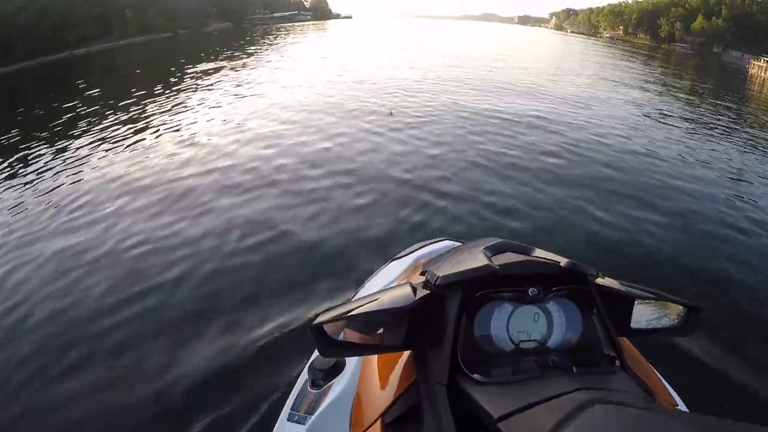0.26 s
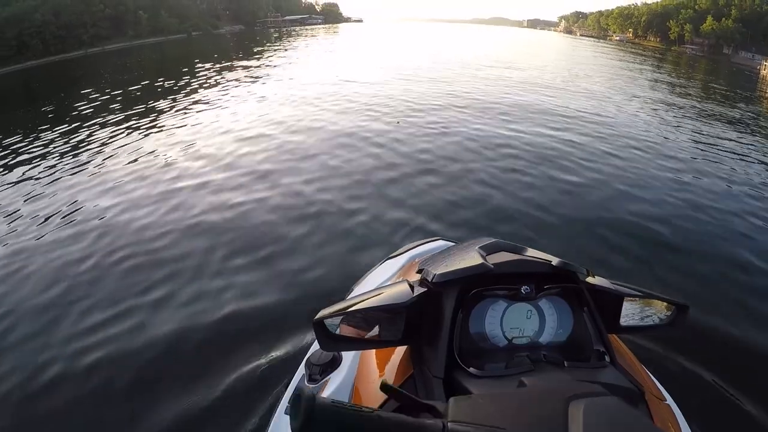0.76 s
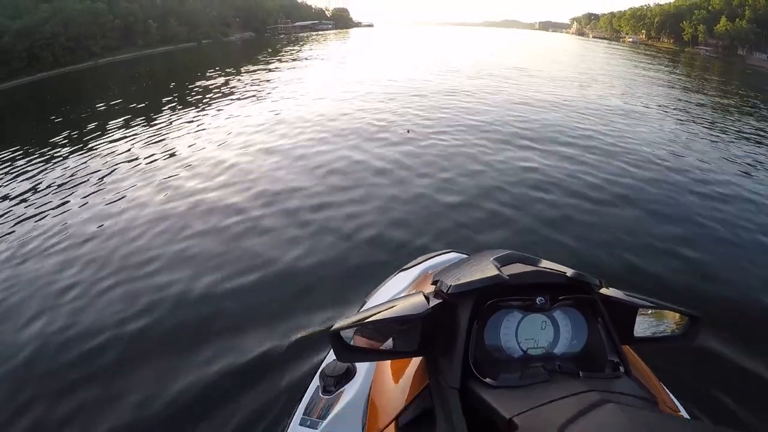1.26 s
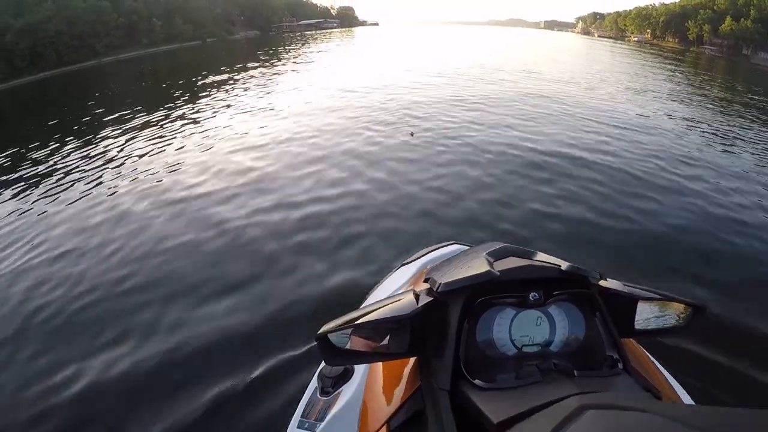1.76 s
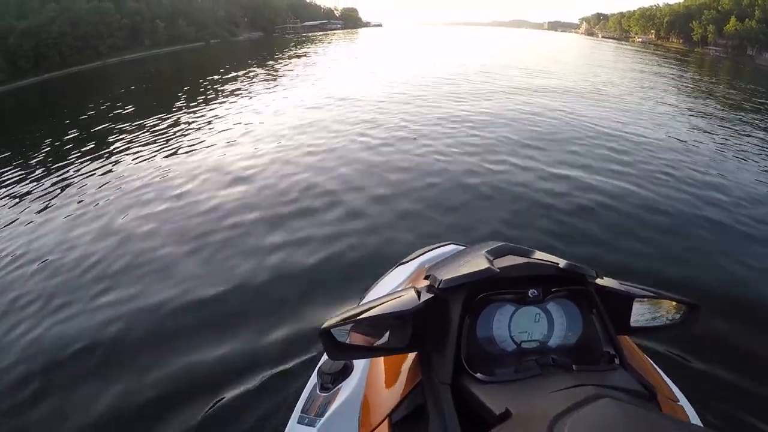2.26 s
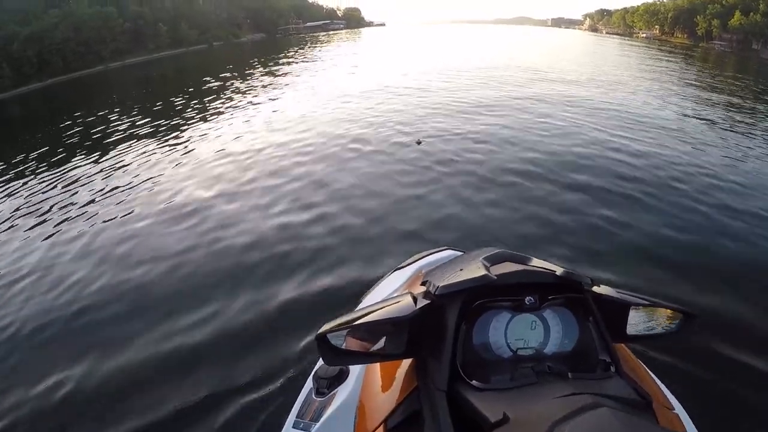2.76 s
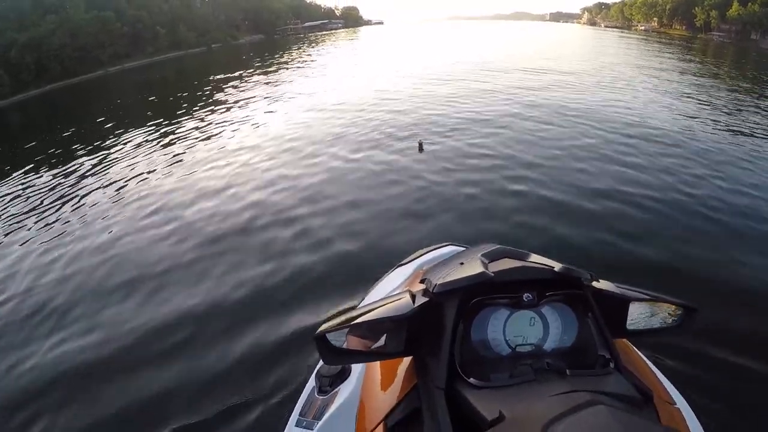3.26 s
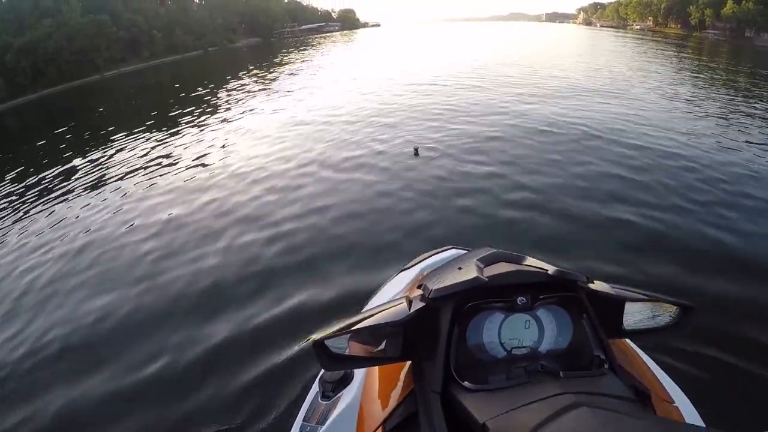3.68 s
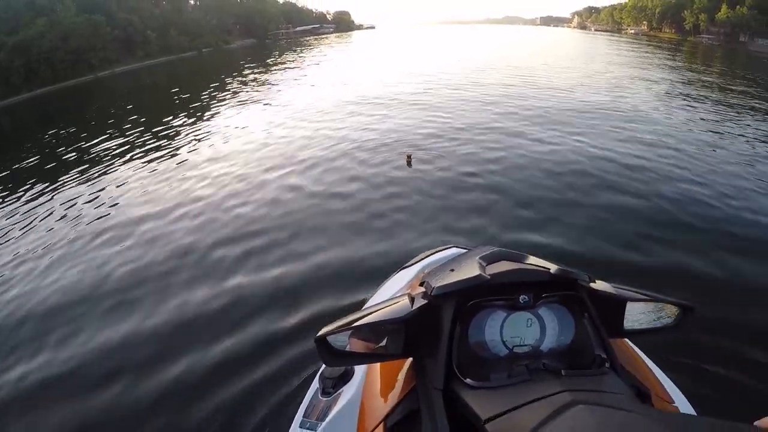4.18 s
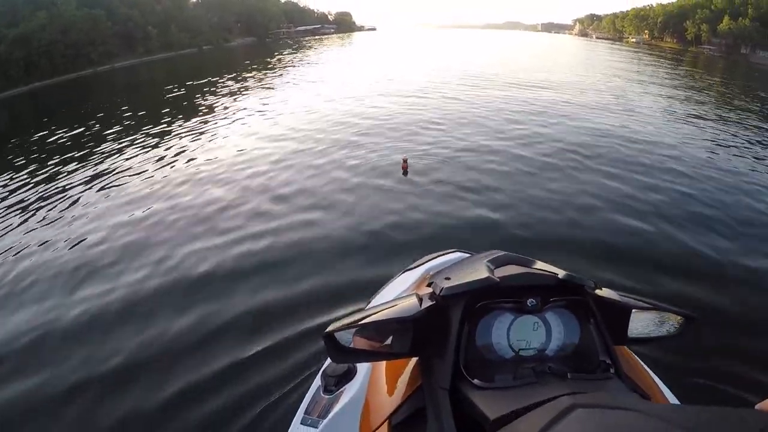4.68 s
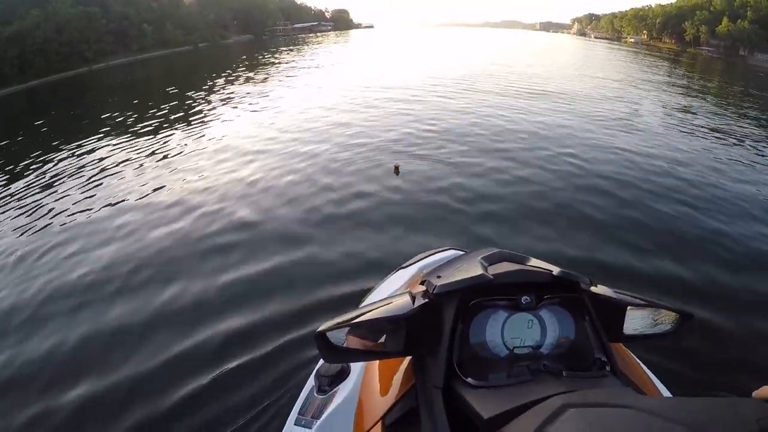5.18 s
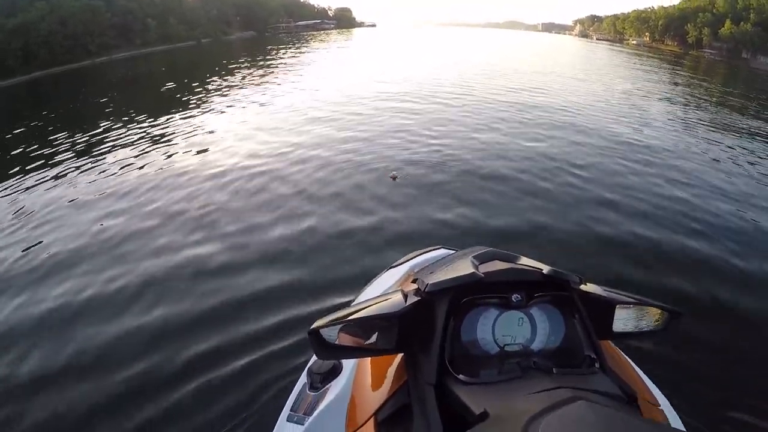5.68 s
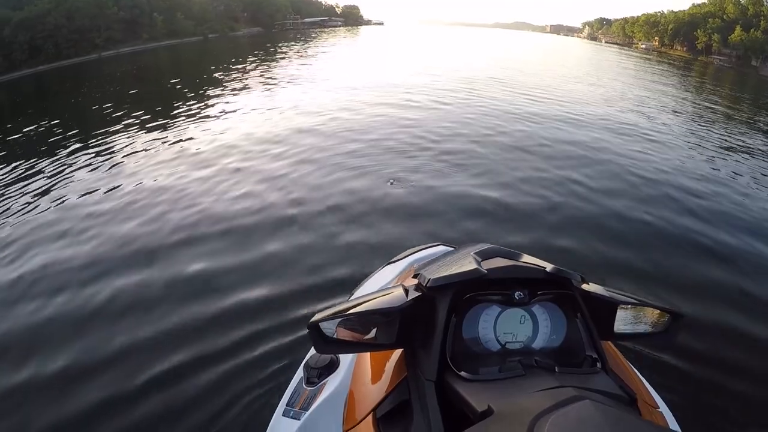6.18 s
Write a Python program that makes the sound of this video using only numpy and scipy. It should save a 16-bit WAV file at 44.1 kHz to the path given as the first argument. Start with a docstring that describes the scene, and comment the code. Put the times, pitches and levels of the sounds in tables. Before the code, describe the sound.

A small three-cylinder engine idles unevenly with a throbbing low hum, light metallic ticking, soft water wash and bubbles, and one brief squeak.

```python
"""A three-cylinder four-stroke water scooter idles unevenly on a calm lake, heard at the rider's helmet.
Engine lines rock the mounts; firings and exhaust gas ring the hull; the jet pump hums as modulated tones.
Valve ticks and rattle ring the metal cover; shaped noise makes wash, rumble and foot-well slop.
Gliding sines make bubbles, splashes and gurgles; a thin stack of overtones squeaks once, in two pulls."""
import sys
import numpy as np
from scipy import signal
from scipy.fft import rfft, irfft, next_fast_len
from scipy.io import wavfile
from scipy.ndimage import uniform_filter1d, map_coordinates

SR = 44100
rng = np.random.default_rng(int(sys.argv[2]) if len(sys.argv) > 2 else 0)


def unload_audio(sound):
    """Save the sound as a 16-bit wav file, at the path given as the first command line argument."""
    columns = np.transpose(np.atleast_2d(sound))
    # keep every value between -1 and 1, then stretch to whole-number steps
    steps = np.round(np.clip(columns, -1, 1) * 32767)
    wavfile.write(sys.argv[1], SR, steps.astype(np.int16))


def rack_gain(trim_db):
    """Turn a fader trim in dB into the linear factor to multiply a signal by."""
    fader = np.asarray(trim_db, float)
    return 10 ** (fader / 20)


N = 284356
T = np.arange(N) / SR
FULL = next_fast_len(N + SR)
HZ = np.fft.rfftfreq(FULL, 1 / SR)
SIDES = np.array([[.5], [-.5]])  # left, right


def level(x, rms_db):
    """Scale to an rms level."""
    return x * rack_gain(rms_db) / np.sqrt(np.mean(x ** 2))


def over_hz(table):
    """A (frequency [Hz], value) table read on a log-frequency axis."""
    hz, value = np.transpose(table)
    return np.interp(np.log(HZ + 1), np.log(hz + 1), value)


def ring(x, hz, width_hz):
    """Two-pole resonance, gain 1 at the centre."""
    return signal.lfilter(*signal.iirpeak(hz, hz / width_hz, SR), x)


def walk(rate_hz):
    """Random levels held 1 / rate_hz and smoothed twice; spread near 1."""
    hold = int(SR / rate_hz)
    steps = np.repeat(rng.standard_normal(N // hold + 1), hold)
    return 1.91 * uniform_filter1d(uniform_filter1d(steps, hold), hold)[:N]


def strikes(times_s, sizes):
    """Single-sample blows at the given moments."""
    return np.bincount(np.clip((times_s * SR).astype(int), 0, N - 1), sizes, N)


def moments(turn, places):
    """Times [s] at which each engine cycle passes the given places."""
    return np.interp(np.arange(int(turn[-1]))[:, None] + places, turn, T)


# left over right at the microphone ports: (frequency [Hz], level difference [dB])
PORT_DIFFERENCE = [(30, 2.5), (100, 3.5), (140, 1.6), (270, 0.5), (430, 1.5), (620, -1.3), (860, -8.5),
                   (1500, -7), (3000, -6.5), (4500, 0), (7000, 0), (8000, -6), (11000, -1)]
# phase by which left leads: (frequency [Hz], lead [rad])
PORT_PHASE = [(30, -.2), (340, -.3), (620, -.76), (860, -1.55), (1200, -1.1), (1500, .3), (2000, .74),
              (3200, .05), (4500, -.5), (6000, -1.4), (8000, -3.06), (11000, -3.6)]


def port_response():
    """Level and phase differences between the ports, half on each side."""
    return rack_gain(SIDES * over_hz(PORT_DIFFERENCE)) * np.exp(1j * SIDES * over_hz(PORT_PHASE))


def ports(x):
    """One source as the left and right ports hear it."""
    return irfft(rfft(x, FULL) * port_response(), FULL)[:, :N]


# hunting idle: (time [s], engine cycle rate [Hz], half the crank speed)
IDLE_SPEED = [(0.0, 15.51), (0.17, 14.97), (0.3, 15.89), (0.37, 15.03), (0.42, 15.81), (0.56, 15.58),
              (0.62, 15.01), (0.73, 15.47), (0.78, 15.13), (0.84, 15.76), (0.98, 14.95), (1.11, 14.75),
              (1.16, 15.32), (1.29, 15.66), (1.49, 15.06), (1.54, 15.48), (1.65, 14.75), (1.84, 15.5),
              (2.06, 14.9), (2.28, 15.66), (2.43, 15.78), (2.78, 15.27), (3.04, 15.33), (3.23, 16.07),
              (3.28, 15.18), (3.35, 15.96), (3.65, 14.95), (3.7, 15.23), (3.98, 15.03), (4.03, 15.68),
              (4.17, 15.34), (4.27, 15.62), (4.41, 15.02), (4.5, 15.59), (4.76, 14.85), (5.05, 15.63),
              (5.1, 15.23), (5.29, 15.58), (5.54, 15.02), (5.79, 15.66), (5.84, 15.11), (6.01, 15.72),
              (6.24, 15.39), (6.45, 15.77)]
START_CYCLES = .066


def idle():
    """Engine position in cycles, two crank turns each: the integral of the hunting speed."""
    return START_CYCLES + np.cumsum(np.interp(T, *np.transpose(IDLE_SPEED))) / SR


# engine lines: (multiple of cycle rate, rms level [dB], wobble [dB], thump place in cycle [0-1])
ROCKING_LINES = [(2, -59, 1.2, .63), (3, -54, 1.2, .63), (4, -47, .7, .63), (5, -67, 1.5, .73),
                 (6, -72, 2.5, .63), (9, -62, 2.5, .29), (11, -66, 2.5, .28), (13, -63, 2.5, .28)]


def rocking(turn):
    """Engine rocks on its mounts: cycle harmonics sharing a place add into one inward thump a cycle."""
    out = 0
    for multiple, rms_db, wobble_db, place in ROCKING_LINES:
        line = np.cos(2 * np.pi * multiple * (turn - place))
        out = out - np.sqrt(2) * rack_gain(rms_db + wobble_db * walk(6)) * line
    return out


# firings: (place in cycle [0-1], relative strength [dB])
FIRING_PLACES = [(0.201, -4), (0.528, -8.5), (0.87, -8)]
# exhaust and hull modes: (frequency [Hz], nominal width [Hz], firing gain [dB], gas gain [dB])
HULL_MODES = [(142.2, 23.7, -4, -5), (175.7, 56, -6, -2.5), (221, 36.5, -5, -5.5), (312.7, 27, -8.5, -13.5),
              (393.7, 28, -11, -15.5), (431.6, 35.3, -7.5, -5.5), (452.2, 17, -7, -12.5)]
# underwater burble, used about each column's mean: (time [s], lower-mode level [dB], upper-mode level [dB])
BURBLE_SWELL = [(0.05, -59, -61.5), (0.07, -52, -61), (0.28, -50.5, -58), (0.99, -51.5, -56),
                (1.11, -50, -62), (1.39, -53.5, -58), (1.69, -53.5, -60), (2.35, -51, -59),
                (2.42, -48, -53.5), (2.44, -48.5, -57.5), (2.93, -54.5, -56), (2.97, -47, -63),
                (3.05, -56, -60), (3.07, -49.5, -58), (3.29, -51, -57), (3.71, -54, -58.5),
                (4.63, -53, -58), (4.75, -50.5, -61), (4.9, -53.5, -57), (5.39, -51, -57), (5.44, -55, -59),
                (5.53, -49, -55), (5.57, -49, -66), (5.64, -52, -56), (5.69, -53, -60), (5.78, -51, -56),
                (5.96, -55, -59.5), (6.15, -47.5, -54.5), (6.19, -52.5, -60), (6.4, -49.5, -55.5)]
FIRING_RMS_DB, FIRING_SCATTER_DB, FIRING_JITTER_S = -53.5, 2, .0007
GAS_RMS_DB, UPPER_HZ = -54.5, 300


def exhaust(turn):
    """Uneven firings and turbulent gas ring the same modes; exhaust burbles under the waterline."""
    place, strength_db = np.transpose(FIRING_PLACES)
    times = moments(turn, place)
    times_s = times + FIRING_JITTER_S * rng.standard_normal(times.shape)
    strengths_db = strength_db + FIRING_SCATTER_DB * rng.standard_normal(times.shape)
    blows = strikes(times_s.ravel(), rack_gain(strengths_db).ravel())
    gas = rng.standard_normal(N) * rack_gain(1.4 * walk(12))
    s, *swells_db = np.transpose(BURBLE_SWELL)
    lower, upper = (rack_gain(np.interp(T, s, db - db.mean())) for db in swells_db)
    fired, swirl = 0, 0
    for k, (hz, width_hz, fired_db, gas_db) in enumerate(HULL_MODES):
        swell = upper if hz > UPPER_HZ else lower
        # ringing each mode twice keeps the valleys dark
        fired_mode = ring(ring(blows, hz, 1.6 * width_hz), hz, 1.6 * width_hz)
        gas_mode = ring(ring(gas, hz, 1.34 * width_hz), hz, 1.34 * width_hz)
        fired = fired + (-1) ** k * rack_gain(fired_db) * swell * fired_mode
        swirl = swirl + rack_gain(gas_db) * swell * gas_mode
    return level(fired, FIRING_RMS_DB) + level(swirl, GAS_RMS_DB)


# main pump line before wobble: (time [s], rms level [dB])
HUM_LEVEL = [(0.0, -40.5), (0.07, -53), (0.16, -44), (0.23, -54.5), (0.36, -46.5), (0.38, -51.5),
             (0.55, -52), (0.61, -43), (0.7, -52.5), (0.74, -47), (0.84, -55.5), (0.9, -47), (1.11, -45),
             (1.17, -63.5), (1.18, -53), (1.67, -43.5), (1.83, -51.5), (1.92, -42), (1.98, -48.5),
             (2.06, -42), (2.08, -47), (2.39, -57.5), (2.42, -50.5), (2.53, -56), (2.55, -49.5),
             (2.71, -49.5), (2.75, -45.5), (2.95, -49), (3.02, -44), (3.05, -54), (3.09, -50.5),
             (3.14, -59.5), (3.21, -50), (3.38, -54.5), (3.48, -49.5), (3.5, -52.5), (3.59, -42.5),
             (3.73, -48), (3.92, -45), (4.02, -52.5), (4.06, -46), (4.24, -51.5), (4.42, -42), (4.47, -54),
             (4.52, -46.5), (4.76, -44), (5.04, -54.5), (5.1, -46.5), (5.14, -54), (5.24, -48.5),
             (5.28, -58.5), (5.37, -48.5), (5.62, -45), (5.78, -55), (5.82, -43.5), (5.93, -53.5),
             (6.16, -53), (6.2, -43.5), (6.23, -52.5), (6.45, -48.5)]
HUM_MULTIPLE, HUM_LEAD_S, HUM_WOBBLE_DB = 18, .028, 1.08


def pump(turn, flutter_rad=.3, lower_db=-13, upper_db=-17):
    """Blades passing vanes hum; a neighbour line one cycle rate to each side makes the hum throb."""
    hz = HUM_MULTIPLE * np.interp(T + HUM_LEAD_S, *np.transpose(IDLE_SPEED))
    rms_db = np.interp(T, *np.transpose(HUM_LEVEL)) + HUM_WOBBLE_DB * walk(14)
    blade = 2 * np.pi * np.cumsum(hz) / SR + flutter_rad * walk(25)
    cycle = 2 * np.pi * turn + 1.27 * walk(5)
    lines = np.cos(blade) + rack_gain(lower_db) * np.cos(blade - cycle) + rack_gain(upper_db) * np.cos(blade + cycle)
    return np.sqrt(2) * rack_gain(rms_db) * lines


# loose cover modes: (frequency [Hz], width [Hz], rms level [dB])
RATTLE_MODES = [(2935, 160, -92.5), (3380, 130, -92), (3750, 200, -95.5)]


def rattle(turn):
    """Tiny random knocks, bunched by the firings, ring the cover's main modes."""
    bunch_db = 2.4 * np.cos(2 * np.pi * len(FIRING_PLACES) * (turn - .98))
    knock_db = 5 * rng.exponential(size=N) ** .7 + bunch_db + 2 * walk(20)
    knocks = rng.standard_normal(N) * rack_gain(knock_db)
    return sum(level(ring(knocks, hz, width_hz), rms_db) for hz, width_hz, rms_db in RATTLE_MODES)


# port-to-port likeness of water noise: (frequency [Hz], likeness [0-1])
LIKENESS = [(30, 0.95), (140, 1), (430, 0.5), (700, 0.98), (1100, 0.3), (2000, 0.3), (3400, 0.2),
            (6000, 0.1), (10000, 0.2)]


def rush(spectrum, flicker_db, treble_db=0, count=20):
    """Noise in half-octave bands, neighbours flickering partly together; partly alike at both ports."""
    alike = np.clip(over_hz(LIKENESS), 0, 1)
    white = rfft(rng.standard_normal((2, FULL)))
    pair = np.array([white[0], alike * white[0] + np.sqrt(1 - alike ** 2) * white[1]])
    pair = pair * rack_gain(over_hz(spectrum)) * port_response()
    scale = np.sqrt(np.mean(irfft(pair.mean(0), FULL) ** 2))
    step = 2 * np.log2(HZ / 16 + 1e-9)  # half octaves above 16 Hz
    out, shared = 0, walk(3.9)
    for k in range(count):
        shared = .58 * shared + .7 * walk(10)
        treble_share = np.clip((k - 13) / 3, 0, 1)  # 0 at 1.4 kHz, 1 from 4.1 kHz
        band = irfft(pair * np.clip(1 - abs(step - k), 0, 1), FULL)[:, :N]
        out = out + band * rack_gain(flicker_db * shared + treble_share * treble_db)
    return out / scale


# wash; spray less wash, about its mean, lifts the treble: (time [s], wash level [dB], spray level [dB])
WASH_LEVEL = [(0.05, -65.5, -84), (0.23, -66.5, -81.5), (0.24, -74, -81), (0.28, -63.5, -82.5),
              (0.37, -67.5, -83), (0.4, -62, -83), (0.44, -71, -83), (0.46, -65, -83), (0.85, -64, -82),
              (1.11, -67, -82), (1.14, -64.5, -83.5), (1.2, -67.5, -84), (1.94, -67, -82),
              (2.19, -68, -85.5), (2.33, -66, -83), (2.4, -68, -83.5), (2.54, -64, -84), (2.56, -67.5, -84),
              (2.74, -63, -82), (2.76, -66.5, -83), (3.14, -66, -84.5), (3.25, -67, -85.5),
              (3.36, -64.5, -82), (3.37, -60.5, -82), (3.41, -65, -82), (3.59, -66.5, -84.5),
              (3.85, -66.5, -83.5), (4.88, -67.5, -85), (4.91, -66.5, -84.5), (5.3, -65, -82),
              (5.78, -68, -86), (5.82, -64.5, -81.5), (5.83, -66.5, -84.5), (5.92, -64, -84),
              (5.96, -67.5, -85), (5.99, -64, -79.5), (6.13, -65, -82.5), (6.15, -67, -84),
              (6.38, -63, -82), (6.4, -63.5, -84.5)]
# wash spectrum: (frequency [Hz], relative density [dB per Hz])
WASH_SPECTRUM = [(300, -31), (510, -3), (582, -4.5), (729, -4), (854, -5.5), (937, -9.5), (1080, -8),
                 (2560, -22.5), (3420, -26.5), (4180, -31), (5150, -30), (5550, -25), (6130, -24),
                 (6990, -25.5), (7900, -32.5), (12000, -45), (15600, -81), (22000, -120)]


def wash(turn):
    """Water rushes along the hull, whose shaking pulses it once a crank turn."""
    s, wash_db, spray_db = np.transpose(WASH_LEVEL)
    lift_db = spray_db - wash_db
    treble_db = np.interp(T, s, lift_db - lift_db.mean())
    pulse_db = .75 * np.cos(4 * np.pi * (turn - .05))
    return rack_gain(np.interp(T, s, wash_db) + pulse_db) * rush(WASH_SPECTRUM, .6, treble_db)


# rumble spectrum: (frequency [Hz], relative density [dB per Hz])
RUMBLE_SPECTRUM = [(6, -15), (20, -7), (60, 5), (100, -2), (130, -4.5), (250, -2), (340, -6.5), (520, -21),
                   (800, -40)]
RUMBLE_DB = -59


def rumble():
    """Low water noise around the hull, flickering band by band."""
    return rack_gain(RUMBLE_DB) * rush(RUMBLE_SPECTRUM, 1.1, count=12)


# foot-well air modes before shaking: (frequency [Hz], width [Hz], rms level [dB])
POCKET_MODES = [(859.6, 18, -74.5), (787, 40, -82), (628, 40, -80)]
POCKET_DRIFT = .005  # relative pitch


def pocket(turn):
    """Slop rings air pockets, their pitch drifting with the water level, shaken once a crank turn."""
    slop = rng.standard_normal(N)
    rung = sum(level(ring(slop, hz, width_hz), rms_db) for hz, width_hz, rms_db in POCKET_MODES)
    position = np.cumsum(1 + POCKET_DRIFT * walk(6))
    drifting = map_coordinates(rung, [position], mode="mirror")
    return drifting * rack_gain(2 * walk(9) + 2 * np.cos(4 * np.pi * (turn - .1)))


# loud valve blows, before TICK_LAG_S: (time [s], blow level [dB])
LOUD_TICKS = [(0.1217, -62), (0.188, -58), (0.2319, -56.5), (0.2758, -63), (0.3187, -64), (0.3826, -59.5),
              (0.4484, -64), (0.5113, -62), (0.5976, -63), (0.6405, -57), (0.6859, -66), (0.7502, -65),
              (0.8575, -59), (0.8994, -64), (0.9438, -61), (1.032, -61), (1.1653, -68), (1.296, -62),
              (1.4257, -63), (1.4916, -59), (1.6233, -67), (1.69, -61), (1.7574, -60), (1.9525, -67),
              (2.0847, -63), (2.1516, -64), (2.3037, -64), (2.3301, -61), (2.3451, -59), (2.4374, -61.5),
              (2.4738, -63), (2.601, -62), (2.6439, -58), (2.6858, -56), (2.7138, -63), (2.7946, -56),
              (2.8824, -62), (3.057, -62), (3.3124, -65), (3.3553, -58), (3.4386, -58), (3.6342, -66),
              (3.7005, -71), (3.8322, -60), (3.8976, -56.5), (3.9574, -65), (3.9754, -58.5), (4.0318, -61),
              (4.0532, -67), (4.1166, -68), (4.1595, -66), (4.2887, -67), (4.3535, -59.5), (4.4194, -65),
              (4.4638, -68), (4.4848, -64), (4.614, -61), (4.6798, -67), (4.7447, -57.5), (4.9442, -62),
              (5.0964, -57), (5.1376, -58), (5.249, -60), (5.2914, -60), (5.3343, -59), (5.3568, -61),
              (5.3987, -63), (5.4221, -68), (5.463, -57.5), (5.5304, -60), (5.7923, -68), (5.817, -60.5),
              (5.922, -62), (6.0083, -61), (6.0502, -61), (6.1789, -59), (6.2433, -58), (6.2867, -62),
              (6.3286, -57.5), (6.371, -55.5)]
# regular valve blows: (place in cycle [0-1], blow level [dB])
VALVE_PLACES = [(.96, -69), (.31, -69.5), (.63, -70)]
# metal cover modes: (frequency [Hz], relative level [dB], t60 [s])
COVER_MODES = [(1550, -4, .012), (2050, -2, .016), (2500, -4, .012), (2950, 1, .022), (3400, 0, .018),
               (3750, -1, .018), (4300, -6, .01), (4750, -5, .01), (5400, -3, .008), (6000, -3, .008),
               (6700, -5, .007)]
VALVE_SCATTER_DB, MODE_SCATTER_DB, TICK_LAG_S = 1.5, 1.5, .001
CRACK_DECAY_S, SNAP_DB, CRACK_GAIN_DB, RING_GAIN_DB = .0012, 9, -3.5, -1.5


def valves(turn):
    """Three ticks a cycle, some much louder: a thin crack that rings the metal cover."""
    place, soft_db = np.transpose(VALVE_PLACES)
    times = moments(turn, place)
    loud_s, loud_db = np.transpose(LOUD_TICKS)
    # a loud tick replaces any soft one within 8 ms
    free = abs(times[..., None] - loud_s).min(-1) > .008
    soft = free * rack_gain(soft_db + VALVE_SCATTER_DB * rng.standard_normal(times.shape))
    blows = strikes(times.ravel(), soft.ravel()) + strikes(loud_s + TICK_LAG_S, rack_gain(loud_db))
    t, rung = T[:SR // 30], 0
    for hz, db, t60_s in COVER_MODES:
        mode = rack_gain(db) * np.exp(-np.log(1000) * t / t60_s) * np.sin(2 * np.pi * (hz * t + rng.random()))
        # each blow lands elsewhere: another mix of modes
        mixed = blows * rack_gain(MODE_SCATTER_DB * rng.standard_normal(N))
        rung = rung + signal.fftconvolve(mixed, mode)[:N]
    rung = rung / np.sqrt(len(COVER_MODES))
    envelope = signal.lfilter([1], [1, -np.exp(-1 / (CRACK_DECAY_S * SR))], blows)
    burst = envelope * rng.standard_normal(N) + rack_gain(SNAP_DB) * blows
    crack = ring(ring(burst, 3200, 7000), 3200, 7000)
    both = rack_gain(RING_GAIN_DB) * rung + rack_gain(CRACK_GAIN_DB) * crack
    # padded seat over the engine swallows the top
    return signal.sosfilt(signal.butter(4, 7600, fs=SR, output="sos"), both)


def add_bubble(out, start_s, length_s, hz0, hz1, peak_db):
    """A short gliding ring of trapped air."""
    i, u = int(start_s * SR), np.arange(int(length_s * SR)) / (length_s * SR)
    phase = length_s * (hz0 * u + (hz1 - hz0) * u ** 2 / 2)
    out[i:i + len(u)] += np.sin(np.pi * u ** .72) * rack_gain(peak_db) * np.sin(2 * np.pi * phase)


# bubble swarms against the hull: (time [s], length [s], level [dB])
SPLASH_SWARMS = [(0.452, .1, -71), (0.621, 0.073, -68), (0.742, 0.073, -73), (.92, 0.06, -67),
                 (2.62, .14, -66), (2.9, .06, -72), (3.339, 0.066, -63), (3.919, .08, -74),
                 (4.15, 0.08, -67), (5.12, .1, -75), (5.998, 0.11, -70), (6.298, 0.099, -72)]
# gurgles before chopping: (time [s], length [s], start pitch [Hz], end pitch [Hz], peak level [dB])
LONE_GURGLES = [(1.56, .11, 1300, 1340, -79), (2.64, .09, 1330, 1320, -74), (2.71, .075, 1450, 1480, -74),
                (4.03, .06, 1620, 1680, -73), (4.09, .09, 1930, 2050, -76)]
BUBBLES_PER_S, BUBBLE_DB, SWARM_COUNT = 49, -78, 12


def bubbles(turn, chop_db=2.5):
    """Small rising bubbles, random and in splashes; the firings' shaking chops lone gurgles."""
    small, lone = np.zeros((2, N + SR))
    for when, size, loud in rng.random((int(BUBBLES_PER_S * N / SR), 3)):
        hz = 600 * 6 ** size
        add_bubble(small, when * N / SR, 14 / hz, hz, 1.2 * hz, BUBBLE_DB - 14 * size + 9 * loud)
    for start_s, length_s, db in SPLASH_SWARMS:
        for when, size, loud in rng.random((SWARM_COUNT, 3)):
            hz = 520 * 3.1 ** size
            add_bubble(small, start_s + when * length_s, 12 / hz, hz, 1.15 * hz, db - 9 * size - 6 * loud)
    for row in LONE_GURGLES:
        add_bubble(lone, *row)
    shake_db = chop_db * np.cos(2 * np.pi * len(FIRING_PLACES) * (turn - .05))
    return small[:N] + lone[:N] * rack_gain(shake_db + 2 * walk(220))


# squeak in two pulls, before colour and wobble: (time [s], pitch [Hz], level [dB])
SQUEAK_GLIDE = [(3.76, 840, -95), (3.79, 850, -72), (3.815, 860, -80), (3.835, 875, -77), (3.86, 960, -74),
                (3.885, 1065, -71), (3.905, 1075, -73), (3.92, 1075, -100), (3.94, 960, -100),
                (3.97, 950, -74), (4.03, 945, -77), (4.065, 920, -72), (4.12, 935, -69), (4.15, 950, -74),
                (4.175, 950, -100)]
# squeak colour: (frequency [Hz], gain [dB])
SQUEAK_GAIN = [(800, 0), (1000, 0), (1700, -2), (1850, -14), (2300, -22), (2800, -11), (3200, -20),
               (3700, -14), (4150, -15), (4300, -14), (4600, -22), (5000, -40)]


def squeak(count=6):
    """Five gliding harmonics through a fixed colour, slightly hoarse."""
    s, hz, db = np.transpose(SQUEAK_GLIDE)
    pitch_hz = np.interp(T, s, hz)
    phase = np.cumsum(pitch_hz * (1 + .008 * walk(150))) / SR
    stack = 0
    for k in range(1, count):
        colour_db = np.interp(k * pitch_hz, *np.transpose(SQUEAK_GAIN))
        stack = stack + rack_gain(colour_db + 3 * walk(60)) * np.sin(2 * np.pi * k * phase)
    return stack * rack_gain(np.interp(T, s, db) + 1.5 * walk(90)) * (T > s[0]) * (T < s[-1])


def scene():
    """Engine and small sources share one port response; ticks lean right; water noise surrounds the hull."""
    turn = idle()
    engine = rocking(turn) + exhaust(turn) + pump(turn)
    cover = (rattle(turn) + valves(turn)) * rack_gain(np.array([[-.9], [.9]]))
    water = wash(turn) + rumble()
    return ports(engine + pocket(turn) + bubbles(turn) + squeak()) + cover + water


def roll_off(x):
    """The treble ends steeply here."""
    return signal.sosfilt(signal.butter(12, 13500, fs=SR, output="sos"), x)


def record(dry):
    """The finished two-port mix."""
    return roll_off(dry)


dry = scene()
out = record(dry)
unload_audio(out)
```